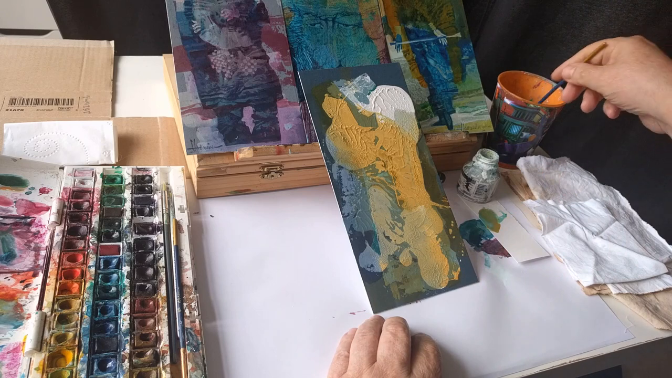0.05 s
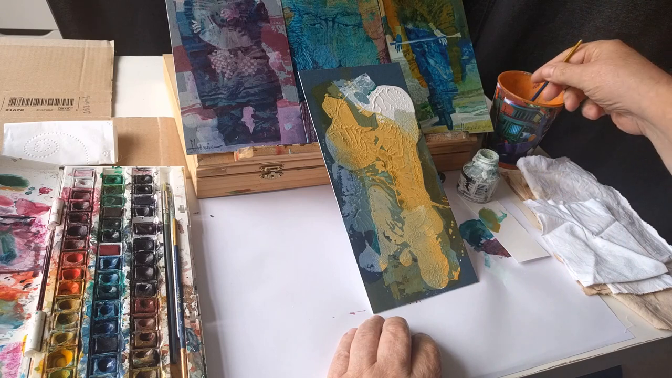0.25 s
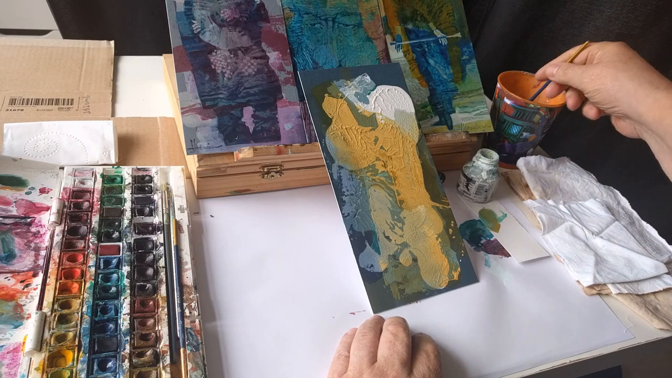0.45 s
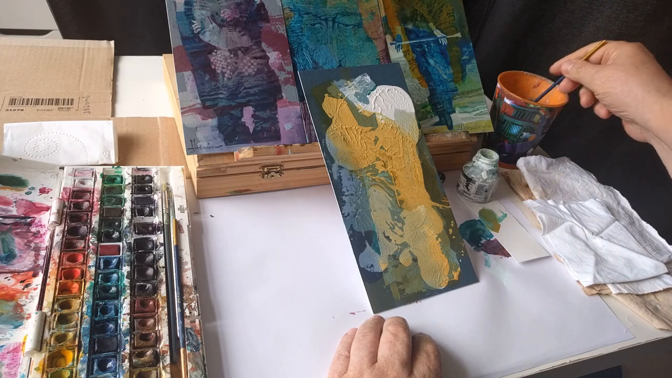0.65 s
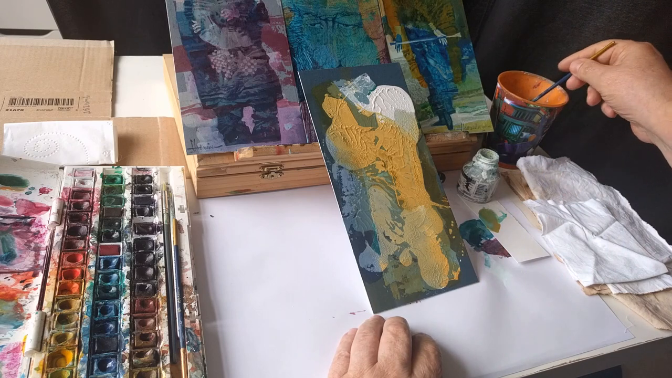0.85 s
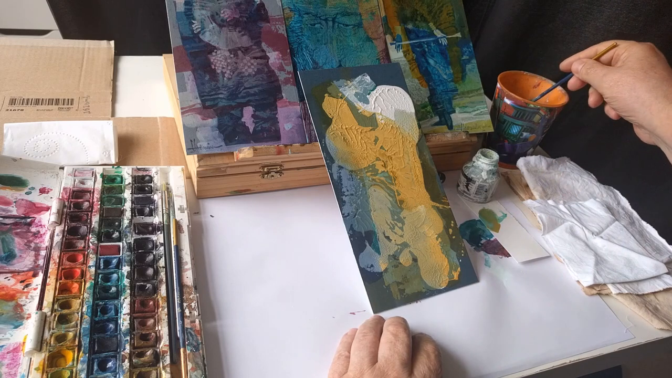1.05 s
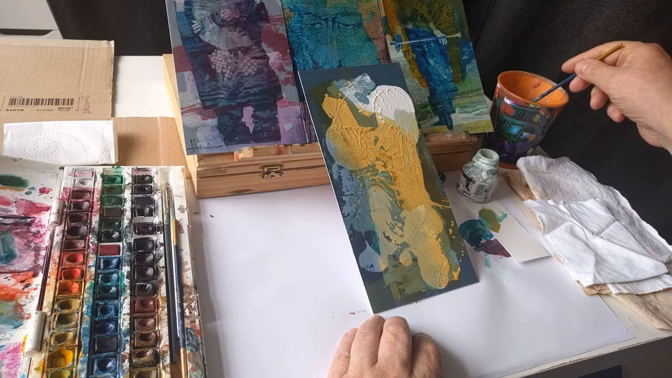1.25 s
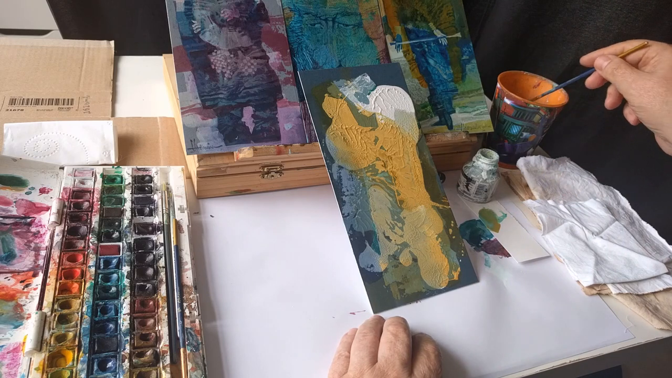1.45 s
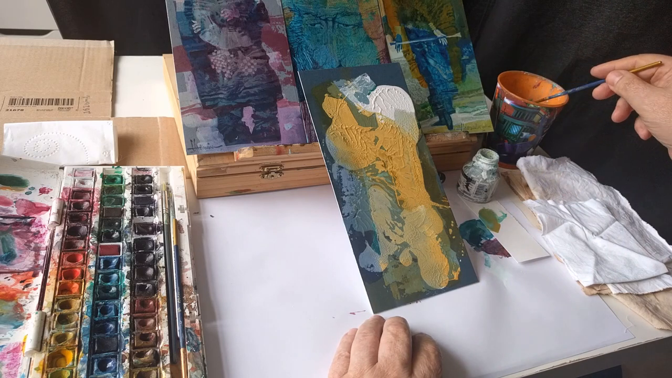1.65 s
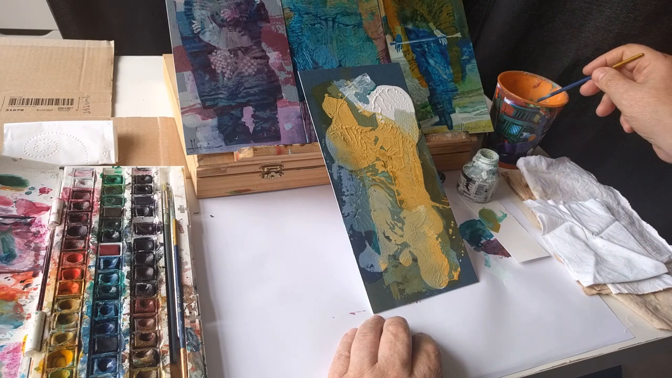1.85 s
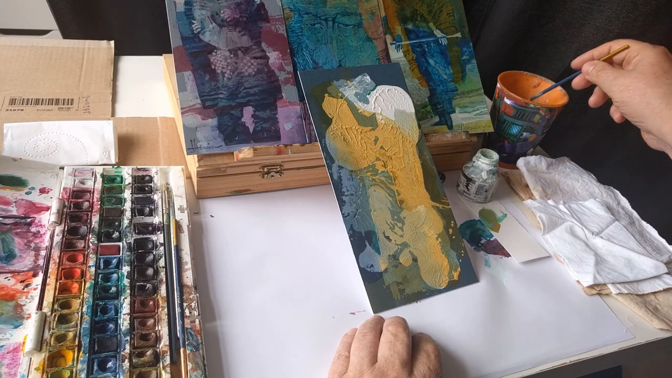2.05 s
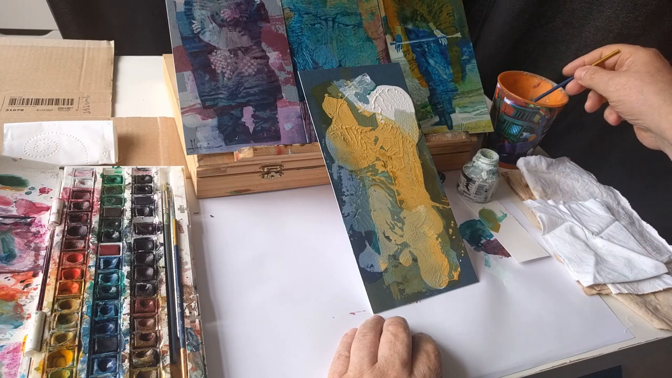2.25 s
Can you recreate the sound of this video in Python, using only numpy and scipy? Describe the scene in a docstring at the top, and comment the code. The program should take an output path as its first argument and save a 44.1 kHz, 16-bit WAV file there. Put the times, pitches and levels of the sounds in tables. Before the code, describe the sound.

A paintbrush is rinsed in a jar of water, heard close in a small room. Short, bright, damped clinks strike the jar at about 0.23, 0.34 and, loudest, 0.5 seconds. Soft swishing continues, with bubble plops and gritty bristle ticks clustering from 0.7 to 1.4. It quiets until 2.0, then a small flurry of ticks and plops peaks near 2.2. Faint hiss and low hum lie underneath.

```python
"""A paintbrush is rinsed in a jar of water on a table in a small room.
The brush clinks three times on the jar (damped sine modes, noise scrape and thud) while it stirs:
bubbles plop (rising sines plus noise), water sloshes (shaped noise), bristles tick (gritty sines)
and swish (random grains). Under it lie steady hiss and a faint wavering hum and whine.
All but the background also reaches the ear through the room response."""
import sys
import numpy as np
from scipy import signal
from scipy.fft import rfft, irfft
from scipy.io import wavfile

SR = 44100
rng = np.random.default_rng(int(sys.argv[2]) if len(sys.argv) > 2 else 0)


def to_wav(s):
    """Save 16-bit WAV."""
    ch = np.atleast_2d(s).T  # columns
    pcm = np.round(np.clip(ch, -1, 1) * 32767)  # PCM
    wavfile.write(sys.argv[1], SR, pcm.astype(np.int16))


N = 101430

# bristle noise spectrum, shared by ticks and swish: f/Hz, level/dB
SWISH_SPECTRUM = [(500, -15), (1500, -48), (3200, -5), (4300, 5), (6000, -2.5), (8800, 9), (11000, -1.5),
                  (15000, -7)]
PITCH_RISE_PER_S = 0.61  # bubble pitch, fraction of its start value


def amp(db):
    """Decibels to gain."""
    return 10 ** (np.asarray(db) / 20)


def unit(x):
    """Scales to rms 1."""
    return x / np.sqrt(np.mean(x ** 2) + 1e-20)


def read(points, hz):
    """Reads a table on a log-frequency axis."""
    f, value = np.transpose(points)
    return np.interp(np.log(hz + 1), np.log(f + 1), value)


def fade(t, t60_s):
    """Exponential decay, 60 dB in t60_s."""
    return np.exp(-np.log(1000) * t / t60_s)


def rise(t, rise_s):
    """Linear onset from 0 to 1."""
    return np.minimum(t / rise_s, 1)


def add(mix, start_s, sound):
    """Mixes a sound in at a time."""
    part = mix[max(round(start_s * SR), 0):][:len(sound)]
    part += sound[:len(part)]


def colour(x, spectrum):
    """Gives a signal a spectrum, at rms 1."""
    gain = amp(read(spectrum, np.fft.rfftfreq(len(x), 1 / SR)))
    return unit(irfft(rfft(x) * gain, len(x)))


def coloured_noise(length, spectrum):
    """Gaussian noise with a spectrum, at rms 1."""
    return colour(rng.standard_normal(length), spectrum)


def rising_ring(t, hz):
    """Sine whose pitch rises linearly from hz, as a bubble's does."""
    return np.sin(2 * np.pi * hz * (t + PITCH_RISE_PER_S * t ** 2 / 2))


def room(x):
    """Room return: near echoes, low resonances and a noise tail with frequency-dependent decay."""
    # tail decay: f/Hz, t60/s
    tail_t60 = [(200, 0.22), (1200, 0.39), (3500, 0.37), (6000, 0.35), (9000, 0.26), (15000, 0.21)]
    # nearby surfaces: delay/s, level/dB
    near_echoes = [(.0066, -11), (.0073, -22), (.0088, -9), (0.014, -27), (0.0225, -28), (0.028, -20)]
    # low room resonances: f/Hz, level/dB, t60/s
    low_resonances = [(147, 1, 0.25), (181.5, 7, 0.57), (240.2, 8.5, 0.24), (291, 7, 0.64),
                      (393.1, 12.5, 0.34), (422.7, 6.5, 0.83)]
    tail_db, tail_start_s, tail_rise_s = -5, 0.0036, 0.0031

    hz, t, z = signal.stft(rng.standard_normal(SR // 2), SR, nperseg=256)
    decay = fade(t, read(tail_t60, hz)[:, None])
    response = signal.istft(z * decay, SR)[1]
    t = np.arange(len(response)) / SR
    response = response * np.clip((t - tail_start_s) / tail_rise_s, 0, 1)
    response = amp(tail_db) * response / np.linalg.norm(response)
    for delay_s, db in near_echoes:
        add(response, delay_s, amp([db]))
    for hz, db, t60_s in low_resonances:
        decay = fade(t, t60_s)
        response += 2 * amp(db) * decay / decay.sum() * np.cos(2 * np.pi * hz * t)
    return signal.fftconvolve(x, response)[:N]


def background():
    """Steady shaped-noise hiss; hum and whine tones waver in amplitude and phase."""
    # hiss spectrum: f/Hz, relative level/dB
    hiss_spectrum = [(20, 12), (40, -16), (75, 12.5), (130, 6), (190, 5), (300, -1), (500, 1.5),
                     (1000, -5.5), (2500, -9.5), (4500, -12), (6500, -6.5), (7600, -1.5), (8600, 7),
                     (9300, -4), (10200, -10), (12500, -12.5), (15500, -8.5), (17000, -46)]
    # hum and faint whine: f/Hz, level/dB
    tones = [(58, -61.5), (182, -78.5), (9000, -71)]
    hiss_db, waver_depth, waver_step_s = -61, 0.24, 0.04

    t = np.arange(N) / SR
    out = amp(hiss_db) * coloured_noise(N, hiss_spectrum)
    knots_s = np.arange(N // 1000) * waver_step_s
    for hz, db in tones:
        drift = rng.standard_normal(len(knots_s)) + 1j * rng.standard_normal(len(knots_s))
        waver = 1 + waver_depth * np.interp(t, knots_s, drift)
        out += amp(db) * (waver * np.exp(2j * np.pi * hz * t)).real
    return out


def effort_at(s):
    """How hard the hand stirs, in dB."""
    # stirring effort: t/s, level/dB
    effort = [(0, -7), (.2, -8.5), (.34, -1), (.5, -6), (.65, -8.5), (.72, -2), (.82, -9.5), (.9, -1),
              (1.0, -4), (1.09, 3), (1.18, -4.5), (1.27, -4.5), (1.4, -7), (1.52, -10), (1.9, -15.5),
              (2.06, -5.5), (2.15, -6.5), (2.24, 0.5), (2.3, -10)]
    return np.interp(s, *np.transpose(effort))


def stirring():
    """Low shaped-noise slosh and fine wet crackle of random grains follow the effort of the hand."""
    # slosh spectrum: f/Hz, level/dB
    slosh_spectrum = [(50, 0), (100, -9.5), (150, 1.5), (240, 1), (310, -0.5), (410, -4.5), (580, -9.5),
                      (850, -12.5), (1500, -9.5), (2600, -19), (6000, -93)]
    slosh_db, swish_db = -64.5, -67  # at 0 dB effort
    swish_follow_db_per_db = 0.34
    grains_per_s, grain_spread_db = 760, 3.5

    effort_db = effort_at(np.arange(N) / SR)
    slosh = amp(slosh_db + effort_db) * coloured_noise(N, slosh_spectrum)
    size = amp(grain_spread_db * np.minimum(rng.exponential(1, N), 2.5))
    impulses = size * rng.standard_normal(N) * (rng.random(N) < grains_per_s / SR)
    grains = colour(impulses, SWISH_SPECTRUM)
    swish = amp(swish_db + swish_follow_db_per_db * effort_db) * grains
    return slosh + swish + room(slosh + swish)


def tiny_bubbles():
    """Many tiny bubbles ring at random with rising pitch, more of them the harder the hand stirs."""
    rate_per_s, rate_follow = 260, 2.8  # rate at 0 dB effort; dB of rate per dB of effort
    low_hz, high_hz = 2100, 6100
    floor_db, spread_db, t60_cycles = -60, 4, 9.8
    candidates = 1000  # also caps the rate

    out, t = np.zeros(N), np.arange(SR // 30) / SR
    for when, chance, size, strength in rng.random((candidates, 4)):
        start_s = when * N / SR
        hz = low_hz * (high_hz / low_hz) ** size
        rate = rate_per_s * amp(rate_follow * effort_at(start_s))
        if chance < rate * N / SR / candidates:
            ring = fade(t, t60_cycles / hz) * rising_ring(t, hz)
            level_db = floor_db + spread_db * min(-np.log(strength), 2)
            add(out, start_s, amp(level_db) * ring)
    return out + room(out)


def ticks():
    """Bristles and tiny drops make short gritty pings: decaying sines plus a little noise."""
    # pings: t/s, f/Hz, level/dB, t60/s
    pings = [(0.099, 2780, -47, 0.0048), (0.4159, 8800, -34.5, 0.011), (0.425, 8800, -35, 0.0085),
             (0.7178, 9230, -37, 0.0075), (0.8228, 9850, -34.5, 0.0053), (0.85, 5650, -42.5, 0.0041),
             (0.8843, 6600, -33.5, 0.0025), (1.073, 5860, -41, 0.003), (1.076, 7540, -39, 0.0034),
             (1.149, 3700, -46, 0.0059), (1.24, 5900, -42, 0.0052), (1.284, 8800, -44, 0.0076),
             (1.341, 4870, -45.5, 0.0053), (1.345, 8800, -40.5, .004), (1.394, 7000, -37, 0.0024),
             (1.576, 6600, -43, .004), (2.027, 6260, -34.5, 0.0015), (2.058, 8940, -36, .004),
             (2.072, 6160, -38, 0.0024), (2.075, 4470, -48.5, 0.0066), (2.146, 4350, -55, .007),
             (2.203, 9240, -42, 0.01), (2.224, 4750, -52, .006), (2.234, 3900, -50, 0.0035),
             (2.241, 4900, -48, .005)]
    rise_s, grit, room_db = 0.00014, 0.12, -0.5

    out, t = np.zeros(N), np.arange(SR // 40) / SR
    for start_s, hz, db, t60_s in pings:
        ping = np.sin(2 * np.pi * hz * t) + grit * coloured_noise(len(t), SWISH_SPECTRUM)
        add(out, start_s, amp(db) * rise(t, rise_s) * fade(t, t60_s) * ping)
    return out + amp(room_db) * room(out)


def bubbles():
    """Trapped air rings with slightly rising pitch, with a soft noise plop of the water around it."""
    # bubbles: t/s, f/Hz, level/dB, t60/s
    bubble_list = [(0.187, 3520, -42.5, 0.009), (0.321, 960, -50, 0.016), (0.46, 1714, -55.5, 0.061),
                   (0.696, 1490, -38, 0.01), (0.698, 834, -47.5, 0.046), (0.727, 1540, -36.5, 0.0085),
                   (0.745, 3010, -52, 0.019), (0.77, 2910, -55.5, 0.035), (0.879, 1880, -34, 0.0043),
                   (0.882, 1490, -32.5, 0.0066), (0.917, 1320, -34, 0.018), (0.923, 1240, -39, 0.022),
                   (0.937, 1216, -43.5, 0.035), (0.999, 3024, -45.5, 0.014), (1.052, 1425, -41.5, 0.032),
                   (1.0716, 3060, -35, 0.0069), (1.082, 3320, -39, 0.0075), (1.074, 1420, -30, 0.015),
                   (1.081, 2790, -37, 0.012), (1.087, 1167, -35, 0.04), (1.098, 1236, -40.5, 0.035),
                   (1.129, 1166, -44.5, 0.04), (1.148, 3350, -37, 0.0099), (1.173, 3290, -43.5, 0.011),
                   (1.202, 847, -48.5, 0.028), (1.241, 3010, -39.5, 0.012), (1.24, 1570, -36.5, 0.0074),
                   (1.2556, 1301, -31, 0.027), (1.2562, 2120, -37.5, 0.012), (1.2618, 1244, -43.5, 0.023),
                   (1.278, 1295, -40.5, 0.029), (1.2896, 1345, -40.5, 0.014), (1.354, 3430, -43, 0.012),
                   (1.375, 1850, -40.5, 0.0066), (1.393, 3000, -47, 0.016), (2.003, 2230, -49, 0.01),
                   (2.112, 1206, -57, 0.066), (2.142, 3010, -50, 0.017), (2.182, 863, -46, 0.078),
                   (2.2182, 1545, -32.5, 0.017), (2.218, 1980, -40.5, 0.015), (2.226, 1160, -37.5, 0.023),
                   (2.236, 3540, -39, 0.007), (2.243, 3380, -49, 0.0074), (2.248, 1380, -46, 0.021),
                   (2.26, 3000, -47, 0.011), (2.275, 1190, -44.5, 0.022)]
    # share of a bubble sent to the room, by its pitch: f/Hz, level/dB
    room_send = [(850, -4.5), (1300, 1.5), (2000, 4), (3200, -1.5)]
    # plop spectrum: f/Hz, level/dB
    plop_spectrum = [(80, -74), (200, -22), (410, 0.5), (600, -14), (1000, -11), (1500, -2), (2100, -8.5),
                     (2700, -18), (6000, -30)]
    swell_s, plop_rel_db, plop_t60_s = 0.0014, -15, 0.023

    out, sent, t = np.zeros(N), np.zeros(N), np.arange(SR // 8) / SR
    for start_s, hz, db, t60_s in bubble_list:
        ring = fade(t, t60_s) * rising_ring(t, hz)
        plop = amp(plop_rel_db) * fade(t, plop_t60_s) * coloured_noise(len(t), plop_spectrum)
        bubble = amp(db) * rise(t, swell_s) * (ring + plop)
        add(out, start_s, bubble)
        add(sent, start_s, amp(read(room_send, hz)) * bubble)
    return out + room(sent)


def clinks():
    """Each blow rings the damped jar with its own mode strengths, scrapes and thuds into the table."""
    # blows: t/s, level/dB, contact (onset) time/s, table thud level/dB, room level/dB
    blows = [(0.2317, -20, 0.00017, -56.5, -5.5), (0.3423, -23, 0.00062, -50, -7),
             (0.4961, -15, 0.00019, -54.5, -1.5)]
    # jar modes: f/Hz, t60/s, room send/dB, level/dB at the first, second and third blow
    jar_modes = [(875, 0.016, 3.5, -18.5, -25, -33), (1560, 0.0098, -9, -25, -20, -33),
                 (2004, 0.059, -2, -32.5, -32, -22.5), (3327, 0.011, 2.5, -10, -24, -19),
                 (3750, 0.0083, 4, -19.5, -42, -15), (4290, 0.016, 1, -13.5, -42, -19),
                 (5220, 0.0051, 3, -10, -12, -8.5), (5630, 0.016, 9, -20, -32, -17),
                 (6040, 0.0087, 0.5, -7.5, -3, -11.5), (6680, .006, -19, 0, -19, -27),
                 (7000, 0.011, 11, -17, -7, -40), (7600, 0.012, 4.5, -9, -29, -9),
                 (8100, .007, 5, -21, 1.5, -7), (8700, 0.0076, -2, 2.5, -14, 2.5),
                 (9070, 0.0079, 1, -16, 3, -1), (9330, .006, 1.5, 0.5, -18, -2),
                 (10230, 0.0069, 1.5, -29, -6.5, -11), (11100, 0.009, -6, -16, -29, -11),
                 (15200, 0.0036, -7, -18, -15, -9)]
    # scrape spectrum: f/Hz, level/dB
    scrape_spectrum = [(200, -10), (1200, -1), (2700, -0.5), (3300, 6), (4800, -2), (6900, 6.5), (9000, -7),
                       (11000, 0.5), (13500, 1.5), (16000, -17)]
    # thud spectrum: f/Hz, level/dB
    thud_spectrum = [(60, -40), (140, 0.5), (270, -1.5), (400, -2), (650, -15.5), (1500, -5), (2500, -23),
                     (6000, -23.5)]
    scrape_rel_db, scrape_t60_s = -15.5, 0.0095
    scatter_rel_db, scatter_t60_s = -11.5, 0.03  # scrape sent to the room, scattered by the jar
    thud_t60_s = 0.21

    out, t = np.zeros(N), np.arange(SR // 4) / SR
    mode_hz, mode_t60_s, mode_room_db, *blow_levels_db = np.transpose(jar_modes)
    signs = np.cos(np.pi * np.arange(len(jar_modes)))  # neighbouring modes swing in opposite directions
    decays = fade(t, mode_t60_s[:, None])
    modes = signs[:, None] * decays * np.sin(2 * np.pi * mode_hz[:, None] * t)
    for (start_s, db, contact_s, thud_db, room_db), blow_modes_db in zip(blows, blow_levels_db):
        blow = amp(db) * rise(t, contact_s)
        scrape = amp(scrape_rel_db) * fade(t, scrape_t60_s) * coloured_noise(len(t), scrape_spectrum)
        scatter = amp(scatter_rel_db) * fade(t, scatter_t60_s) * coloured_noise(len(t), scrape_spectrum)
        thud = amp(thud_db) * fade(t, thud_t60_s) * coloured_noise(len(t), thud_spectrum)
        add(out, start_s, blow * (amp(blow_modes_db) @ modes + scrape) + thud)
        # each blow reaches the room by its own paths
        sent = blow * (amp(blow_modes_db + mode_room_db) @ modes + scatter) + thud
        add(out, start_s, amp(room_db) * room(sent))
    return out


def scene():
    """Sum of jar, water, bristles and background, one channel."""
    water = stirring() + tiny_bubbles() + bubbles()
    return (background() + water + ticks() + clinks())[None]


def record(dry):
    """Linear-phase low-pass band limit."""
    cutoff_hz = 16400
    lowpass = signal.firwin(255, cutoff_hz, window=("kaiser", 9), fs=SR)
    return signal.oaconvolve(dry, lowpass[None], "same")


dry = scene()
out = record(dry)
to_wav(out)
```